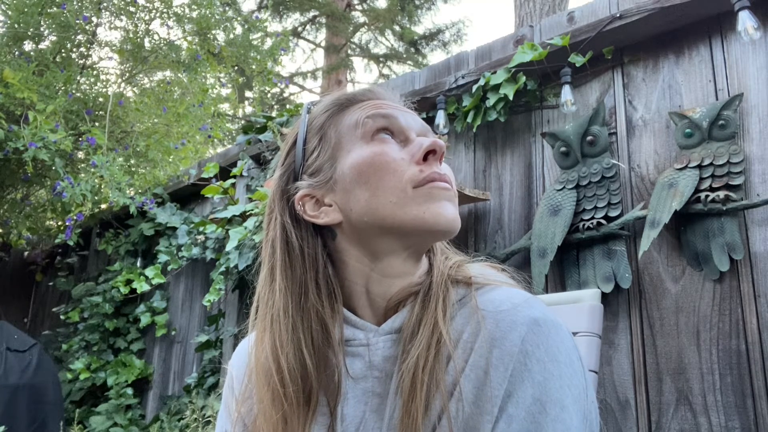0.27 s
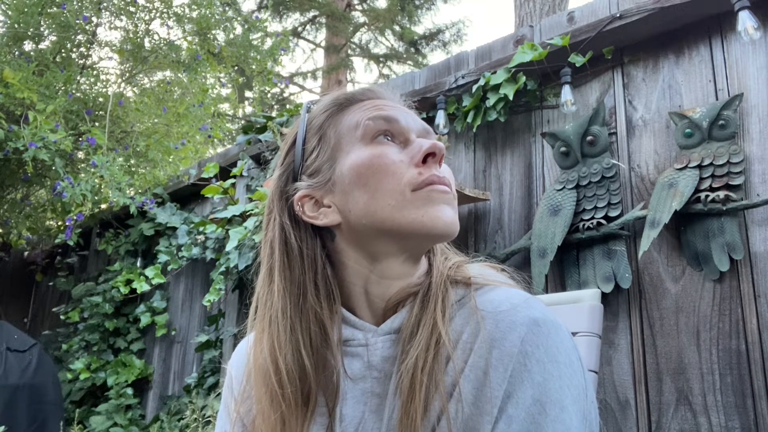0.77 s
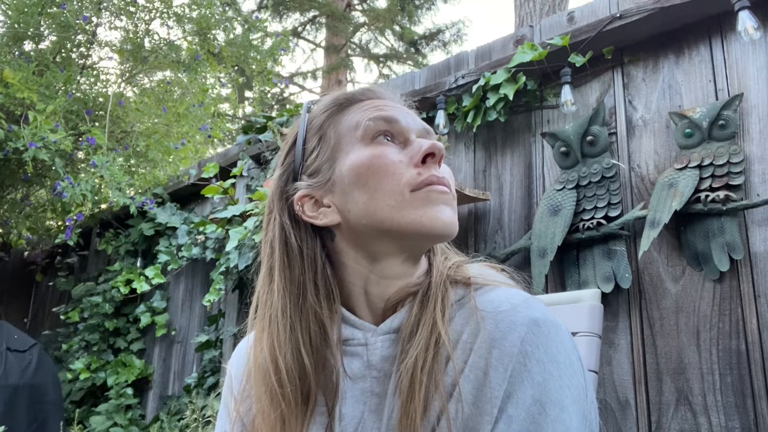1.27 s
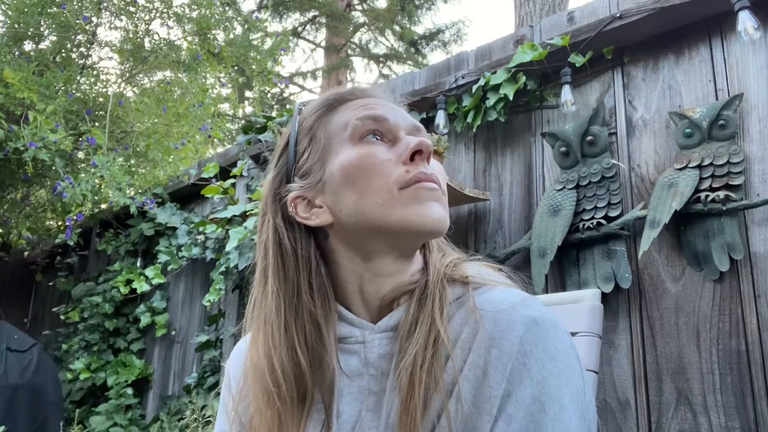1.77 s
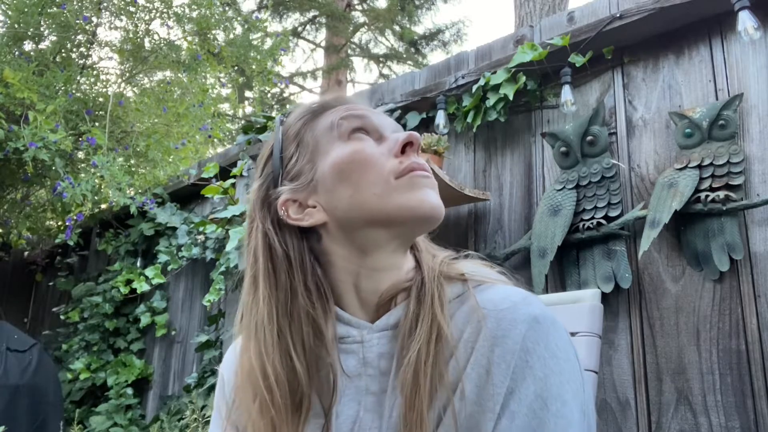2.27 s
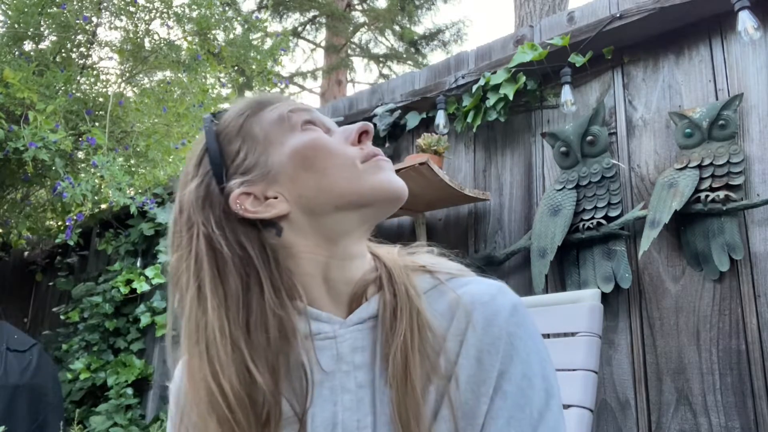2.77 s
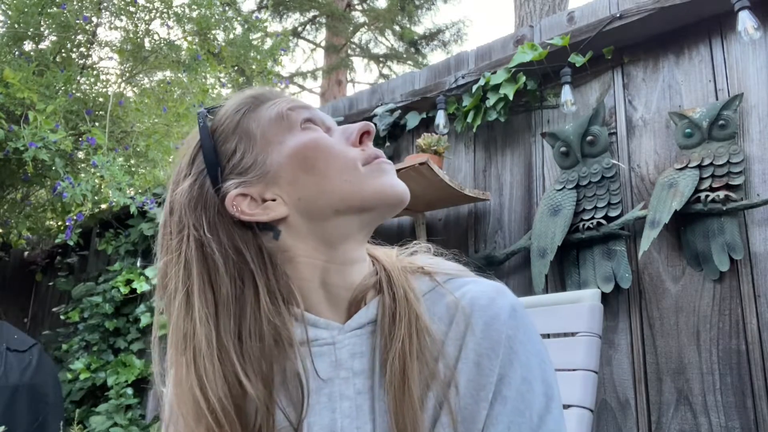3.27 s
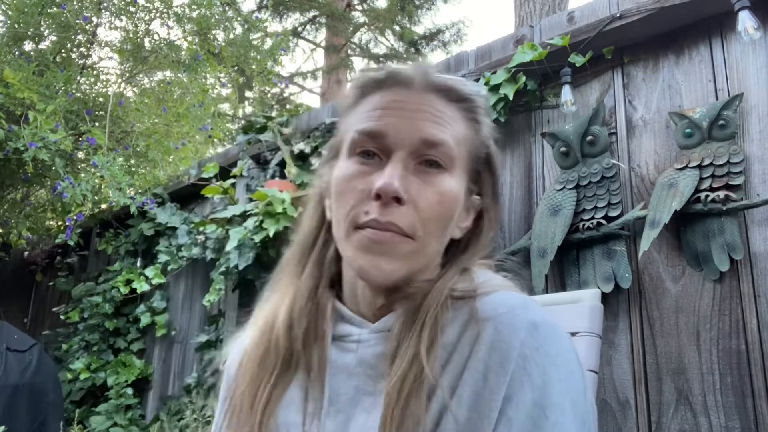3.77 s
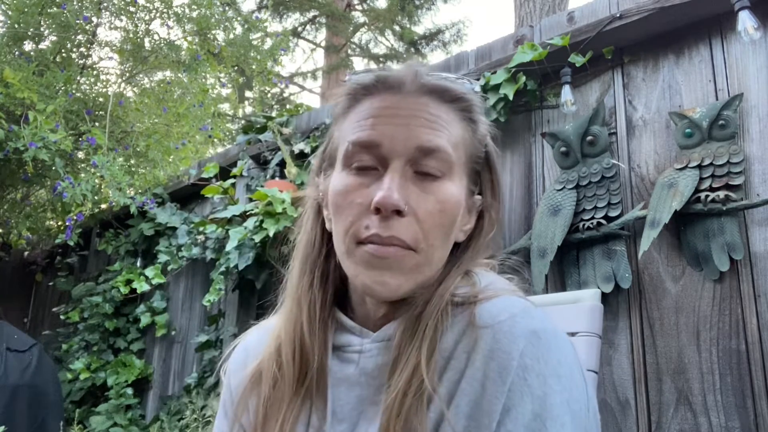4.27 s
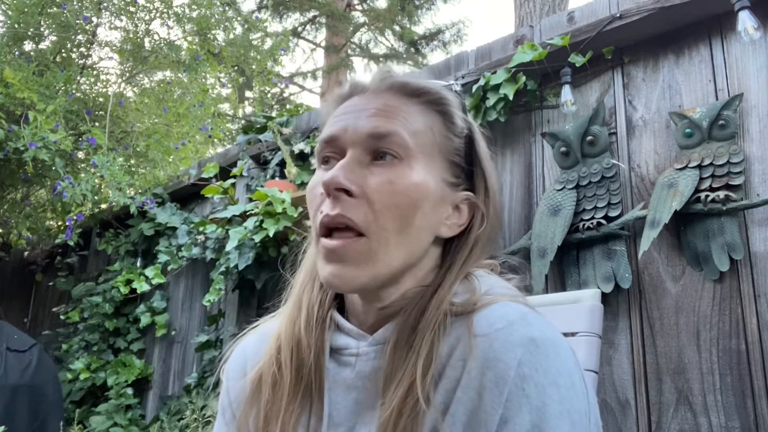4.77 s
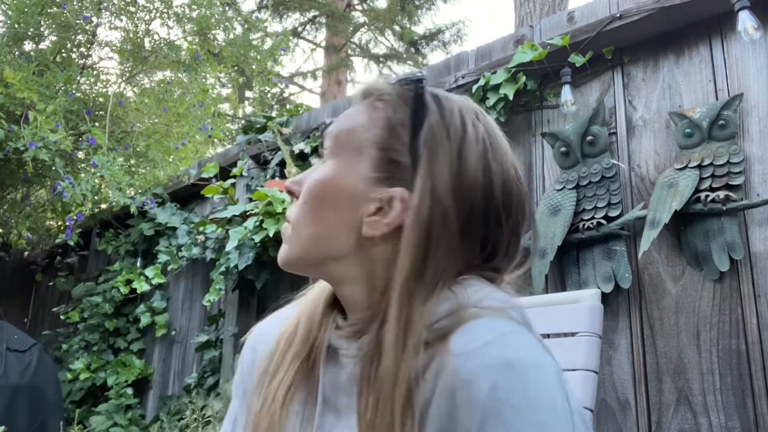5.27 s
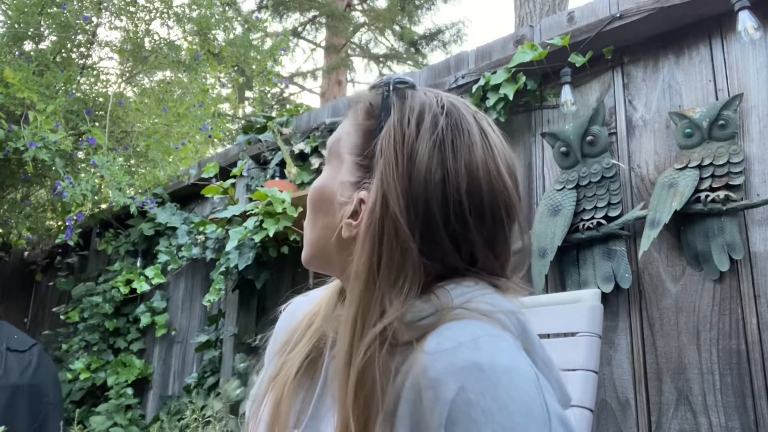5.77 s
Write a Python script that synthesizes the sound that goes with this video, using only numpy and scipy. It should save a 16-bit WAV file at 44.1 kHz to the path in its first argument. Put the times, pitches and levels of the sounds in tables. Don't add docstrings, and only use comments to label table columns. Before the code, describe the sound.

In a fenced, leafy backyard, a hummingbird overhead gives spaced, very high, sharp chips, each a tiny whistle sliding quickly down. A second bird on the left answers a little lower. Fence and trees return short echoes. Far birds twitter faintly early on. Past the middle, a crisp crackle and dull knocks sound close to the stereo microphone, and cloth brushes at the end over soft traffic rumble.

```python
import sys
import numpy as np
from scipy import signal
from scipy.fft import rfft, irfft
from scipy.io import wavfile
from scipy.ndimage import uniform_filter1d

SR = 44100
rng = np.random.default_rng(int(sys.argv[2]) if len(sys.argv) > 2 else 0)


def volts_from_decibels(level):
    exponent = np.asarray(level, float) / 20
    return 10 ** exponent


def unload_audio(sound):
    columns = np.transpose(np.atleast_2d(sound))
    steps = np.round(np.clip(columns, -1, 1) * 32767)
    wavfile.write(sys.argv[1], SR, steps.astype(np.int16))


N = 265526


def evened(x):
    return x / np.sqrt(np.mean(x ** 2) + 1e-20)


def read(points, hz):
    f, value = np.transpose(points)
    return np.interp(np.log(hz + 1), np.log(f + 1), value)


def add(mix, s, sound):
    part = mix[round(s * SR):][:len(sound)]
    part += sound[:len(part)]


def resonate(x, hz, width):
    turn = np.exp(2j * np.pi * np.cumsum(hz * np.ones(len(x))) / SR)
    r = np.exp(-np.pi * width / SR)
    return 2 * (turn * signal.lfilter([1 - r], [1, -r], x / turn)).real


def resonate_twice(x, hz, width):
    return resonate(resonate(x, hz, width), hz, width)


def ports(x, lean_db, lag):
    return np.array([volts_from_decibels(lean_db / 2) * np.roll(x, lag), volts_from_decibels(-lean_db / 2) * x])


def chips(calls, voice, octave_colour):
    drop_s, weak_db, swell_s, length_s, s_per_khz = voice
    glide_share, release_s = .8, .006
    tone, octave, opening = np.zeros((3, N))
    tick = np.sin(2 * np.pi * np.cumsum(np.linspace(14000, 9500, 260)) / SR) * np.hanning(260)
    for s, top_hz, knee_hz, end_hz, level_db in calls:
        length = length_s + s_per_khz * (6000 - end_hz) / 1000
        t = np.arange(round(length * SR)) / SR
        release = np.clip(1 - (length - t) / release_s, 0, 1)

        glide = np.minimum(t / (glide_share * length), 1) ** .8
        hz = knee_hz + (end_hz - knee_hz) * glide
        hz += (top_hz - knee_hz) * np.exp(-(t / drop_s) ** 2)
        hz -= 1.9 * max(end_hz - 6100, 0) * (end_hz < 8000) * release ** 2
        turn = 2 * np.pi * np.cumsum(hz) / SR

        db = level_db + weak_db * np.exp(-(t / swell_s) ** 2)
        edge = np.sin(np.pi / 2 * np.minimum(np.minimum(t / .0012, 1), 1 - release)) ** 2
        wander = .12 * evened(uniform_filter1d(rng.standard_normal(2000), size=60))[:len(t)]
        add(tone, s, volts_from_decibels(db) * np.sin(turn) * edge)
        add(octave, s, volts_from_decibels(db + read(octave_colour, 2 * hz)) * np.sin(2 * turn + wander) * edge)

        grit = 1 + uniform_filter1d(rng.standard_normal(260), size=12)
        add(opening, s - .005, volts_from_decibels(level_db + weak_db - 37) * tick * grit)
        click = resonate_twice(rng.standard_normal(900), 4600, 1100) * np.hanning(900)
        add(opening, s, volts_from_decibels(level_db - 37) * click)
    return tone, octave, opening


def bird(calls, voice, octave_colour, lean_db, lag, echo_db, beam_db, beam_direct_db):
    tone, octave, opening = chips(calls, voice, octave_colour)
    direct = ports(tone + volts_from_decibels(beam_direct_db) * octave + opening, lean_db, lag)
    echo = yard(tone + volts_from_decibels(-14) * opening, .004, 9, 0.056)
    octave_echo = yard(octave, .004, 9, 0.027)
    return direct + volts_from_decibels(echo_db) * (echo + volts_from_decibels(beam_db) * octave_echo)


# (t/s, opening f/Hz, f/Hz after the opening drop, end f/Hz, level/dB)
OVERHEAD_CHIPS = [
    (.157, 9100, 8650, 8400, -26),
    (.688, 9300, 8850, 8550, -29.5),
    (1.201, 8800, 7800, 7150, -25),
    (2.154, 8900, 8050, 5950, -20),
    (2.951, 8900, 8350, 6000, -18),
    (3.751, 8900, 8500, 7200, -23.5),
    (4.584, 8500, 7450, 5650, -15),
    (5.449, 8700, 7100, 5750, -20),
]
# (drop time t/s, opening level/dB, swell time t/s, length t/s at 6 kHz end, extra t/s per kHz lower)
OVERHEAD_VOICE = (.0036, -7, .0035, .027, .0025)
# (octave f/Hz, level/dB)
OVERHEAD_OCTAVE = [(11000, -15), (11900, -16), (12900, -32), (13700, -21), (14600, -18), (15600, -29),
                   (17000, -40)]


def overhead_bird():
    return bird(OVERHEAD_CHIPS, OVERHEAD_VOICE, OVERHEAD_OCTAVE, lean_db=-1.5, lag=-17,
                echo_db=[[-2.2], [-2.4]], beam_db=1.5, beam_direct_db=0.5)


# (t/s, opening f/Hz, f/Hz after the opening drop, end f/Hz, level/dB)
LEFT_CHIPS = [
    (.414, 8900, 7000, 5600, -29),
    (1.807, 7000, 6550, 5500, -22),
    (3.222, 8300, 6500, 5400, -23.5),
    (4.143, 8400, 7300, 5750, -27),
    (5.588, 7800, 6550, 5580, -21),
]
# (drop time t/s, opening level/dB, swell time t/s, length t/s at 6 kHz end, extra t/s per kHz lower)
LEFT_VOICE = (.0042, -14, .007, .020, .019)
# (octave f/Hz, level/dB)
LEFT_OCTAVE = [(11000, -30), (12000, -24), (13000, -19), (14300, -26), (16000, -38)]


def left_bird():
    return bird(LEFT_CHIPS, LEFT_VOICE, LEFT_OCTAVE, lean_db=9, lag=19,
                echo_db=[[1.5], [-2]], beam_db=1.5, beam_direct_db=-14)


# (f/Hz, t/s to fall 60 dB)
YARD_FADE = [(2000, .3), (5500, 0.45), (7500, 0.34), (9500, .36), (12000, 0.27), (15000, 0.14)]


def yard(x, gap_s, slap_db, slap_s):
    taps = np.zeros((2, SR))
    at = np.arange(0, SR - 20, 20) + rng.integers(0, 20, (2, (SR - 1) // 20))
    strength = rng.choice([-1., 1.], at.shape) * rng.exponential(1, at.shape)
    np.put_along_axis(taps, at, strength, 1)
    hz, t, z = signal.stft(taps, SR, nperseg=256)
    fade_db = -60 * t / read(YARD_FADE, hz)[:, None]
    tail = signal.istft(z * volts_from_decibels(fade_db), SR, nperseg=256)[1]
    t = np.arange(tail.shape[1]) / SR
    tail *= np.clip(t / gap_s, 0, 1) * volts_from_decibels(slap_db * np.exp(-(t / slap_s) ** 2))
    return signal.fftconvolve(x[None], tail / np.linalg.norm(tail[0]), axes=1)[:, :N]


def ticks(rows, share, burst_ms):
    out, t = np.zeros(N), np.arange(900) / SR
    for s, db, hz in rows:
        burst = rng.standard_normal(900) ** 3 * np.exp(-1000 * t / burst_ms)
        ring = resonate_twice(burst, hz, share * hz)
        add(out, s, volts_from_decibels(db) * ring / abs(ring).max())
    return out


# (t/s, peak level/dB, ring f/Hz)
KNOCKS = [(1.97, -56, 3500), (2.858, -52, 800), (4.2, -59.5, 1200), (4.26, -67.5, 2610),
          (4.485, -65.5, 1970), (4.521, -49, 1960), (4.609, -48, 1740), (4.7, -45, 2400),
          (4.733, -44, 2660), (4.809, -38, 1497), (4.809, -43, 750), (4.946, -58, 1000), (5.238, -55, 900),
          (5.885, -61.5, 2070), (5.955, -58, 1020)]
# (t/s, peak level/dB, ring f/Hz)
SNAPS = [(2.889, -66, 5000), (4.42, -62, 9000), (4.522, -58, 8000), (4.541, -54, 9600), (4.546, -48, 9300),
         (4.608, -44, 9200), (4.6985, -24, 12500), (4.703, -31, 9000), (4.716, -26, 10000),
         (4.735, -42, 8960), (4.75, -50, 8040), (4.81, -52, 8000), (4.817, -57, 10000)]


def close_ticks():
    close = ticks(KNOCKS, share=.7, burst_ms=2.5) + ticks(SNAPS, share=.55, burst_ms=1.6)
    return ports(close, 1.2, lag=4) + volts_from_decibels(-11) * yard(close, .002, 14, .03)


def rustle(rows, rise):
    out = np.zeros((2, N))
    for s, length, low_hz, high_hz, db in rows:
        sizes = volts_from_decibels(2.1 * np.repeat(rng.exponential(1, 500), 40))
        snaps = rng.standard_normal((3, 20000)) * sizes
        snaps = (snaps[:2] + 2.7 * snaps[2])[:, :round(length * SR)]
        band = signal.butter(4, [low_hz, high_hz], "bandpass", fs=SR, output="sos")
        along = np.linspace(0, 1, snaps.shape[1])
        shape = np.interp(along, [0, np.clip(rise, .01, .9), 1], [0, 1, .3]) ** 2
        for side, part in zip(out, volts_from_decibels(db) * evened(signal.sosfilt(band, snaps)) * shape):
            add(side, s, part)
    return out


# (t/s, length t/s, low f/Hz, high f/Hz, level/dB)
BRUSHES = [
    (1.722, .3, 1300, 4200, -78),
    (1.889, .086, 7500, 12100, -74.5),
    (4.39, .074, 4770, 11110, -77),
    (5.56, .3, 2300, 3100, -76),
    (5.83, .24, 700, 2600, -66),
    (5.82, .42, 2500, 8500, -72),
    (5.85, .3, 8000, 14500, -84),
]
# (t/s, length t/s, low f/Hz, high f/Hz, level/dB)
CRACKLES = [
    (2.886, .09, 2570, 7200, -77),
    (4.518, .07, 1100, 3000, -66),
    (4.585, .14, 900, 3300, -67),
    (4.518, .03, 3500, 14500, -70),
    (4.538, .045, 5500, 14500, -63),
    (4.698, .03, 6500, 14500, -50),
    (4.698, .05, 900, 6000, -59),
    (4.726, .045, 1000, 14000, -53),
    (4.75, .09, 900, 13500, -64),
    (4.815, .12, 800, 2600, -67),
]


def cloth_and_crackles():
    return rustle(BRUSHES, rise=.35) + rustle(CRACKLES, rise=.05)


# (t/s, length t/s, start f/Hz, end f/Hz, level/dB)
FAR_TWITTER = [(0, .11, 6450, 6200, -65), (0, .14, 7800, 7600, -82.5), (.24, .068, 7700, 7200, -59),
               (.29, .068, 6500, 6200, -71), (.89, .13, 7350, 7150, -79), (.965, .044, 6800, 6500, -70),
               (1.08, .12, 6300, 6350, -65), (1.205, .06, 6500, 5400, -58), (1.31, .14, 5800, 5550, -74),
               (2.458, .14, 8850, 8710, -78.5), (2.433, .17, 6900, 6270, -73),
               (2.49, .11, 7600, 7870, -76.5), (2.671, .1, 6050, 5670, -72), (2.683, .04, 4900, 4840, -84)]


def far_birds():
    out = np.zeros(N)
    for s, length, start_hz, end_hz, db in FAR_TWITTER:
        t = np.arange(round(length * SR)) / SR
        wander = evened(uniform_filter1d(rng.standard_normal(9000), 60))[:len(t)]
        shake = np.sin(2 * np.pi * 27 * t) + .9 * wander
        hz = np.linspace(start_hz, end_hz, len(t)) + 160 * shake
        whistle = np.sin(2 * np.pi * np.cumsum(hz) / SR)
        add(out, s, volts_from_decibels(db) * whistle * signal.windows.tukey(len(t), .7))
    return volts_from_decibels(-4) * out + yard(out, 0.0032, 28, 0.026)


# (f/Hz, level/dB per Hz)
TOWN_COLOUR = [(20, -32), (34, -9), (70, -1.5), (117, -2.5), (422, -17.5), (636, -24), (912, -27.5),
               (1090, -38), (1520, -45), (3470, -58), (8310, -53), (9940, -62.5), (11900, -61),
               (13500, -75), (15800, -78.5)]
# (t/s, level/dB)
SWELL = [(0.0, -54), (0.37, -50), (0.52, -54), (1.02, -50), (1.21, -52), (3.1, -49), (3.12, -52),
         (4.9, -49), (5.03, -41), (5.08, -46), (5.4, -49), (5.48, -44), (5.55, -51), (6.02, -46)]
# (f/Hz, likeness [-1 to 1])
SAME = [(60, 0.83), (150, 1), (380, 0.49), (950, -0.38), (2380, 0.01), (5980, 0.08), (15000, 0.42)]
# (f/Hz, level/dB)
LEAN = [(60, 4), (180, 2.0), (550, 0.5), (1650, 3.0), (4970, 3), (15000, -3.5)]


def town():
    frames, hz = N // 512 + 5, np.fft.rfftfreq(2048, 1 / SR)
    a, b, c, d, patches = rng.standard_normal((frames, 1025, 5)).T
    patches = evened(uniform_filter1d(uniform_filter1d(patches, 14, 0), 8, 1))
    s, swell_db = np.transpose(SWELL)
    swell_db = np.interp(np.arange(frames) * 512 / SR, s, swell_db - swell_db.mean())
    swell_share = (.8 * np.exp(-hz / 1500))[:, None]
    same = np.clip(read(SAME, hz), -1, 1)[:, None]
    left = a + 1j * b
    right = same * left + np.sqrt(1 - same ** 2) * (c + 1j * d)
    z = np.array([left, right])
    z *= volts_from_decibels(read(TOWN_COLOUR, hz)[:, None] + 1.5 * patches + swell_db * swell_share)
    z *= volts_from_decibels(np.multiply.outer([.5, -.5], read(LEAN, hz)))[:, :, None]
    return volts_from_decibels(-52) * evened(signal.istft(z, nperseg=2048, noverlap=1536)[1][:, :N])


# (f/Hz, width f/Hz, level/dB)
HUM = [
    (58, 11, -54.5),
    (106, 12, -59.5),
]


def drone():
    low = np.zeros(N)
    for hz, width, db in HUM:
        low += volts_from_decibels(db) * evened(resonate_twice(rng.standard_normal(N), hz, width))
    return ports(low, 1.2, lag=0)


def scene():
    birds = overhead_bird() + left_bird()
    return birds + close_ticks() + cloth_and_crackles() + far_birds() + town() + drone()


def masked(x, depth_db):
    hz, t, z = signal.stft(x, SR, nperseg=1024, noverlap=768)
    power = uniform_filter1d((abs(z) ** 2).sum(0), size=9, axis=0)
    level_db = 10 * np.log10(power + 1e-20)
    loudest = level_db.argmax(0)
    above_khz = (hz[:, None] - hz[loudest]) / 1000
    spread_db = depth_db + np.maximum(1.5 * above_khz, -9 * above_khz)
    keep = np.clip((level_db - level_db.max(0) + spread_db) / 3, .03, 1)
    holed = z * np.where(hz[loudest] > 3000, keep, 1)
    return signal.istft(holed, SR, nperseg=1024, noverlap=768)[1][:, :N]


def top_cut(x):
    return signal.sosfilt(signal.butter(12, 15940, fs=SR, output="sos"), x)


# (f/Hz, level/dB)
MID_COLOUR = [(25, -14.5), (45, 1), (4000, 5), (6000, -0.5), (8000, 2), (10000, 7.5), (11500, 1.5),
              (15000, -4.5)]
# (f/Hz, level/dB)
SIDE_COLOUR = [(25, -26.5), (45, 2.5), (4000, 6), (6500, -2.5), (7800, -6.5), (8400, -7), (9300, -28),
               (10400, -36), (11200, -1), (15000, 8.5)]


def record(dry):
    hz = np.fft.rfftfreq(N, 1 / SR)
    before = rng.standard_normal(700) * np.linspace(.3, 1, 700)
    backwards = np.conj(rfft(before[::-1] / np.linalg.norm(before), N))
    smear = 1 + volts_from_decibels(-35) * backwards * (hz > 5000)
    mid = irfft(rfft(dry[0] + dry[1]) * smear * volts_from_decibels(read(MID_COLOUR, hz)), N) / 2
    side = irfft(rfft(dry[0] - dry[1]) * smear * volts_from_decibels(read(SIDE_COLOUR, hz)), N) / 2
    mix = masked(np.array([mid + side, mid - side]), depth_db=46)
    return top_cut(mix)


dry = scene()
out = record(dry)
unload_audio(out)
```